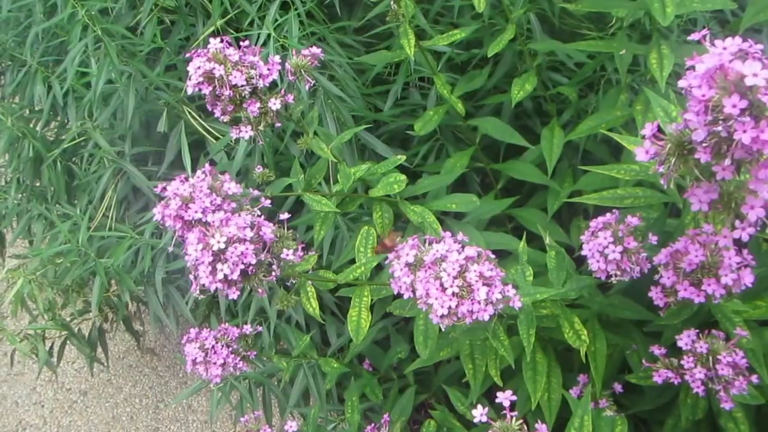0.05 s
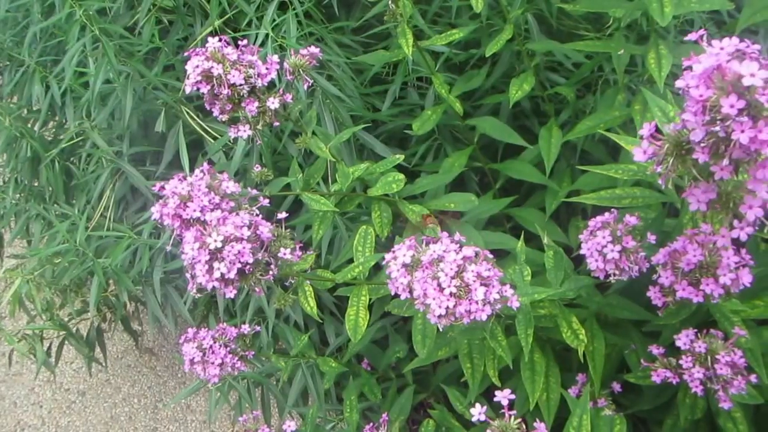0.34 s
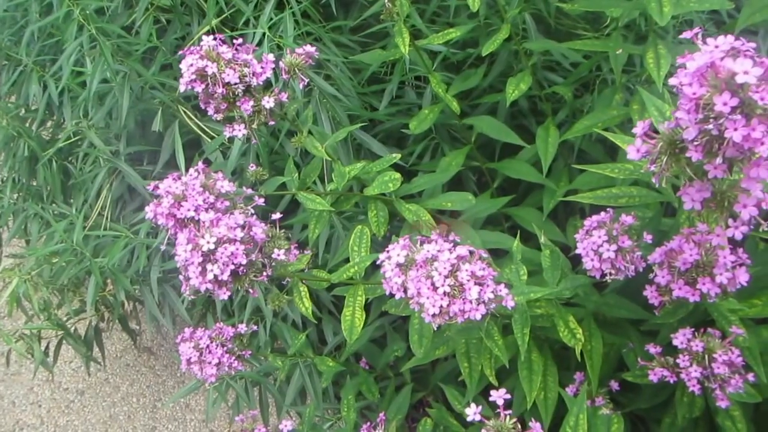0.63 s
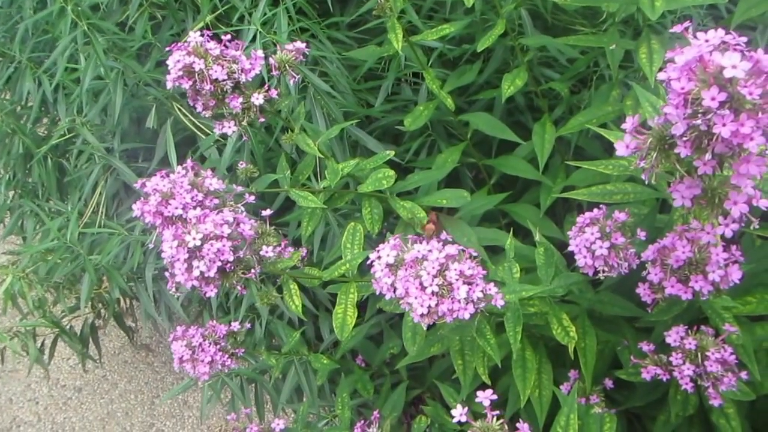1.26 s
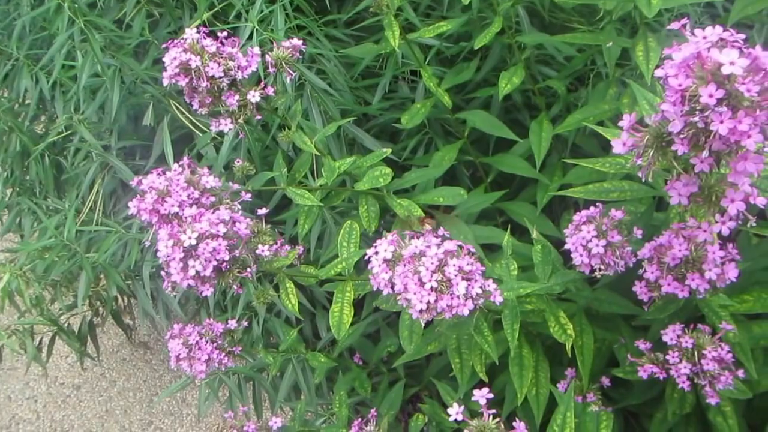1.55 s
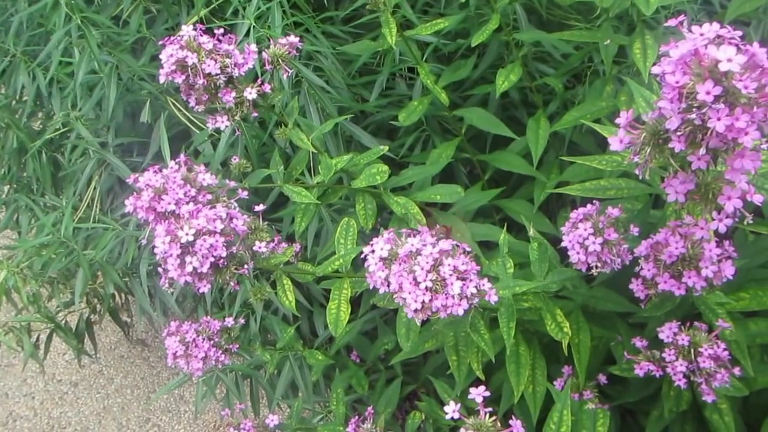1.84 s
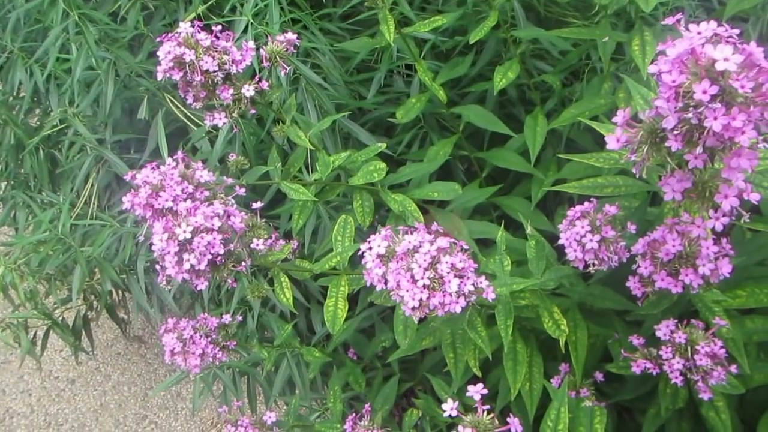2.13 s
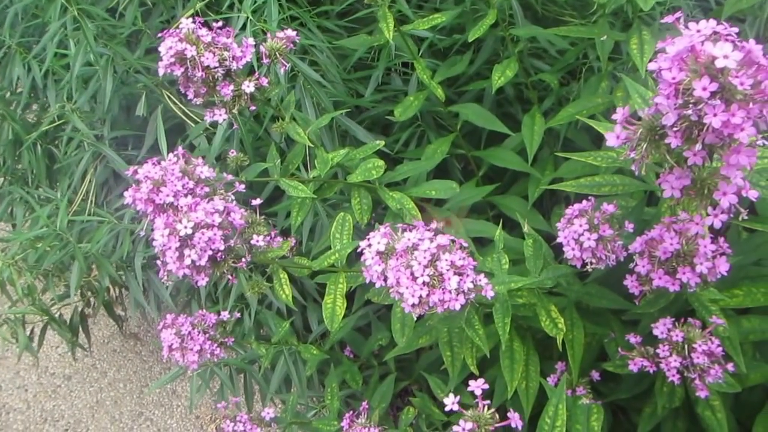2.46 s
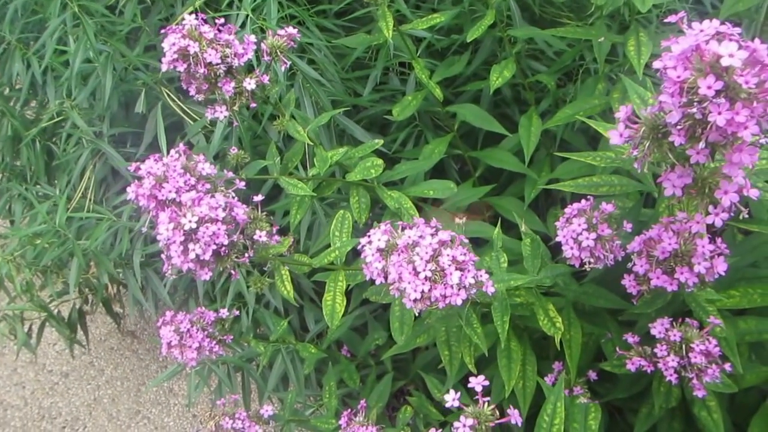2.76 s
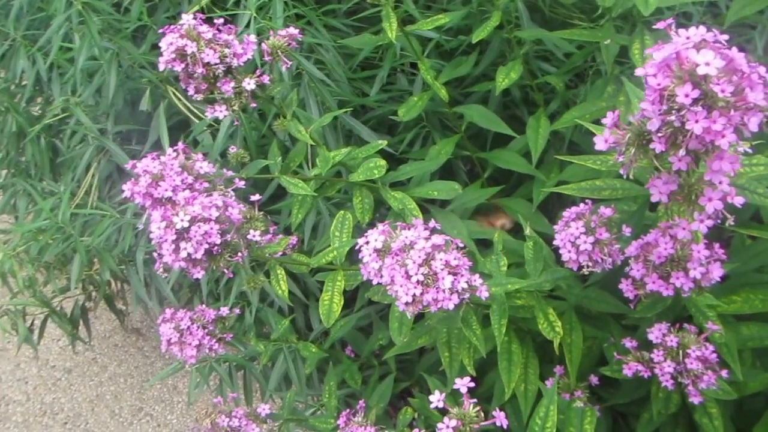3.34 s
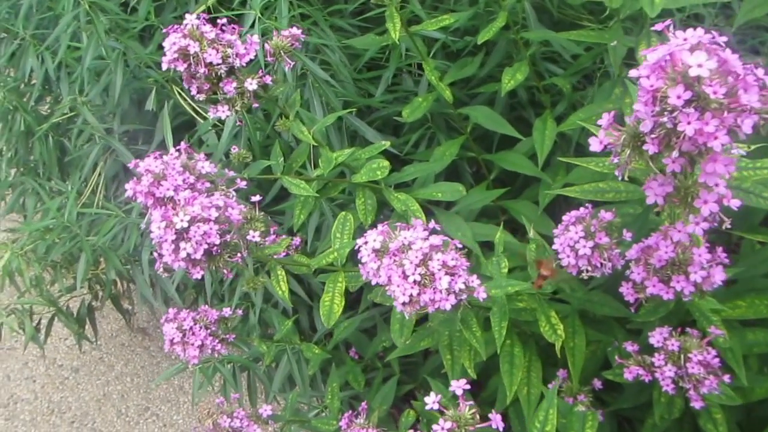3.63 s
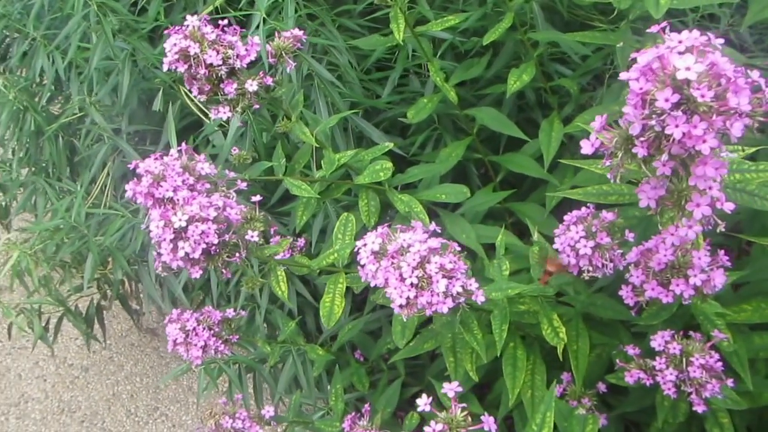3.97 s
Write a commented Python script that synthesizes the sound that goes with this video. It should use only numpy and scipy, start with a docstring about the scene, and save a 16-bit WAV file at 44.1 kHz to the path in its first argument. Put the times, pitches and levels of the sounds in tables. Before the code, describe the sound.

A chorus of crickets trilling outdoors, with far traffic and a droning engine behind.

```python
"""A summer flower bed. From the start, traffic rumbles and an engine drones behind a far insect hiss,
while crickets trill all around, each wing stroke a short falling whistle, and a small katydid rattles
its wings high above them. A dull tap comes early, and leaves brush faintly just before the middle.
Near the end something clicks close by; the katydid stops a moment later and the crickets sing on."""
import sys
import numpy as np
from scipy import signal
from scipy.fft import rfft, irfft
from scipy.io import wavfile
from scipy.ndimage import uniform_filter1d

SR = 44100
rng = np.random.default_rng(int(sys.argv[2]) if len(sys.argv) > 2 else 0)


def to_wav(sig):
    """Store sig (one row per channel, or 1-D mono) as 16-bit WAV at the path in sys.argv[1].

    Samples outside -1..1 are clipped; the rate is SR.
    """
    pcm = np.clip(np.atleast_2d(sig), -1, 1) * 32767
    pcm = np.round(pcm).astype(np.int16)
    wavfile.write(sys.argv[1], SR, pcm.T)  # frames by channels


N = 176400


def undb(db):
    """Turn decibels into a gain."""
    return 10 ** (np.asarray(db) / 20)


def level(x, db):
    """Set a sound's average (rms) level."""
    return x * undb(db) / np.sqrt(np.mean(x ** 2) + 1e-20)


def gain_curve(t, points):
    """A gain that follows (seconds, dB) points."""
    return undb(np.interp(t, *np.array(points, float).T))


def wander(rate):
    """A smooth random wobble of size near 1, changing about rate times a second."""
    hold = max(int(SR / rate), 1)
    steps = np.repeat(rng.standard_normal(N // hold + 2), hold)
    return 1.3 * uniform_filter1d(uniform_filter1d(steps, hold), hold)[:N]


def colour(x, points):
    """Filter by an outline of (Hz, dB) points, falling 80 dB an octave beyond its ends."""
    hz, db = np.array(points, float).T
    octave = np.log2(np.maximum(np.fft.rfftfreq(N, 1 / SR), 1))
    knots = np.log2(hz)
    outside = np.abs(octave - np.clip(octave, knots[0], knots[-1]))
    return irfft(rfft(x) * undb(np.interp(octave, knots, db) - 80 * outside), N)


def noise(points, db):
    """Noise shaped by an outline and set to a level."""
    return level(colour(rng.standard_normal(N), points), db)


def tone(hz):
    """A pure tone that follows a moving pitch."""
    return np.sin(2 * np.pi * (np.cumsum(hz) / SR + rng.random()))


def foliage(x, echo_db, decay_s=.023):
    """Leaves and ground scatter a sound into a short, dense echo."""
    t = np.arange(SR // 4) / SR
    tail = rng.standard_normal(len(t)) * np.exp(-t / decay_s)
    tail /= np.sqrt(np.sum(tail ** 2))
    return x + undb(echo_db) * signal.fftconvolve(x, tail)[:N]


# The road's rumble and the tyres' hiss. Each row: frequency in Hz, relative strength in dB.
RUMBLE_COLOUR = [(12, -21), (20, -9), (48, -0.5), (65, 0), (81, -3), (112, -1.5), (140, -8.5), (226, -12),
                 (258, -18), (594, -18.5), (700, -23.5), (910, -47), (1540, -120)]
TYRE_COLOUR = [(600, -10), (780, -15.5), (880, 2.5), (1050, 0), (1300, 1.5), (1600, 0.5), (2000, -7.5),
               (2500, -12.5), (3100, -18.5), (5000, -20), (9000, -24), (12000, -27), (16000, -22)]
# How the low hum swells. Each row: time in seconds, gain in dB.
HUM_SWELL = [(0, -5), (.3, 5.5), (.55, -6), (.9, 6), (1.3, -10), (1.7, -0.5), (2.5, 1.5), (3.1, -2.5),
             (3.6, 2.5), (4, 5)]

def traffic(t):
    """A far road rumbles and tyres hiss over a low, swelling hum."""
    rumble = noise(RUMBLE_COLOUR, db=-36) * undb(.4 * wander(2.42))
    tyres = noise(TYRE_COLOUR, db=-51.5) * undb(.9 * wander(2.7))
    hum = tone(hz=60.1 + 1.14 * wander(13)) * undb(2.5 * wander(10))
    return rumble + tyres + level(hum, db=-40.5) * gain_curve(t, HUM_SWELL)


# The engine's tones. Each row: multiple of its turning rate, level in dB.
ENGINE_TONES = [(4.55, -46), (5, -44.5), (6, -51.5), (7, -50.5), (8, -55), (12, -59), (13, -63),
                (14, -61.5), (15, -62)]
# Its one booming tone. Each row: time in seconds, level in dB.
BOOM_LEVEL = [(0, -56), (.45, -54), (.75, -43), (1.0, -50), (1.35, -45.5), (1.7, -55), (3.0, -57),
              (3.7, -52), (4, -55)]

def engine(t):
    """An engine drones in wavering tones at multiples of its turning rate."""
    turn_hz = 22.55 * (1 + .00392 * wander(4))
    drone = sum(level(tone(k * turn_hz) * undb(3 * wander(9)), db) for k, db in ENGINE_TONES)
    boom = level(tone(10 * turn_hz), db=0) * gain_curve(t, BOOM_LEVEL)
    return drone + boom


# Faint machine tones. Each row: pitch in Hz, level in dB.
WHINES = [(866, -74), (1012, -66), (1608, -68.5)]

def machine_whine():
    """Machines whine, wobbling a little in pitch and loudness."""
    return sum(level(tone(hz + 4 * wander(30)) * undb(2.6 * wander(12)), db) for hz, db in WHINES)


# The far insects' hiss. Each row: frequency in Hz, relative strength in dB.
INSECT_COLOUR = [(3400, -11.5), (4000, -6.5), (4500, 2), (5100, -0.5), (5700, -3.5), (6500, -4)]

def far_insects():
    """Distant insects blur into a flickering hiss."""
    return noise(INSECT_COLOUR, db=-62.5) * undb(.8 * wander(18))


# The sound of brushing leaves. Each row: frequency in Hz, relative strength in dB.
RUSTLE_COLOUR = [(2300, -6), (3700, 0), (4600, -2), (7000, -12)]

def rustle(t, peak_s=1.795, width_s=.03):
    """Leaves brush together for a moment."""
    return noise(RUSTLE_COLOUR, db=-65) * np.exp(-((t - peak_s) / width_s) ** 2)


# The tap's dull sound. Each row: frequency in Hz, relative strength in dB.
TAP_COLOUR = [(600, -7), (1100, 0), (1550, -5), (2200, -28), (10000, -38)]

def tap(t, start_s=.7402, decay_s=.002):
    """A faint, dull tap: a burst of noise that dies at once."""
    return noise(TAP_COLOUR, db=-39) * (t >= start_s) * np.exp(-np.abs(t - start_s) / decay_s)


# The click and its rebound. Each row: start in seconds, gain in dB.
CLICK_HITS = [(3.3715, -21.5), (3.3756, -36)]
# The tones it rings with. Each row: pitch in Hz, gain in dB, seconds to fade by 60 dB.
CLICK_RING = [(1610, 1, .015), (1734, 0.5, 0.014), (1910, -2.5, 0.015), (2370, -26, 0.0093),
              (4350, -21, 0.0052), (4680, -12, 0.023), (5200, -17, .009)]
# Filters for the snap alone and for the whole click. Each row: frequency in Hz, gain in dB.
SNAP_COLOUR = [(1500, 6), (2200, -1), (3000, -16), (4200, -5), (5300, -1), (6200, -16), (10000, -28)]
CLICK_COLOUR = [(1350, -25), (1540, -1), (8000, -2)]

def click(t, attack_s=.00083, snap_decay_s=.0019):
    """Something small and hard hits and rebounds, each time with a dry snap and a brief ring."""
    out = np.zeros(N)
    for start_s, db in CLICK_HITS:
        age = np.maximum(t - start_s, 0)
        ring = sum(undb(ring_db - 60 * age / fade_s) * np.sin(2 * np.pi * hz * age)
                   for hz, ring_db, fade_s in CLICK_RING)
        snap = noise(SNAP_COLOUR, db=-7) * np.exp(-age / snap_decay_s)
        out += undb(db) * (ring + snap) * (1 - np.exp(-age / attack_s))
    return colour(out, CLICK_COLOUR)


# The parts of one wing cycle. Each row: start, peak and end as shares of the cycle,
# level in dB before the echo and swell, outline of (Hz, dB) points.
WING_PARTS = [ (.03, .1, .24, -73, [(8300, -25), (9350, 0), (9950, -7), (10600, -3), (12000, -14),
              (14000, -25)]), (.43, .47, .6, -71, [(3300, -25), (4100, -1), (5100, 0), (6200, -20)]),
              (.22, .76, .93, -66, [(9500, -22), (11200, -10), (11750, -2), (12000, -11), (12250, 0),
              (12500, -11), (12950, 2), (13300, -3), (14000, -6), (14550, 2), (14950, -3), (15300, 0),
              (15800, -1)])]

def katydid(t, cycles_per_s=27.04, teeth_per_s=14000, stop_s=3.47, rise_db_per_s=.5):
    """Tiny wing teeth strike: each cycle is a short opening scrape, a tick and a long closing rasp."""
    cycle = (cycles_per_s * t + .33) % 1
    rattle = np.zeros(N)
    for start, peak, end, db, outline in WING_PARTS:
        strikes = rng.random(N) < teeth_per_s / SR
        strength = 1 + .56 * rng.standard_normal(N)
        force = np.sqrt(np.interp(cycle, [start, peak, end], [0, 1, 0]))
        rattle += level(colour(strikes * strength * force, outline), db)
    singing = np.clip((stop_s - t) / .008, 0, 1)
    swell = undb(rise_db_per_s * (t - t.mean()) + .62 * wander(25.2))
    return foliage(rattle * singing, echo_db=-5) * swell


def cricket(strokes_per_s, hz, fall_hz, db, sounding_share=.62):
    """The wing's scraper slows along a row of teeth, so each stroke swells and falls in pitch."""
    cycle = np.cumsum(strokes_per_s * (1 + .012 * wander(30))) / SR + rng.random()
    # Every stroke gets its own loudness and tuning.
    size, tuning = rng.standard_normal((1024, 2))[cycle.astype(int) % 1024].T
    along = np.minimum(cycle % 1 / sounding_share, 1)  # 0 to 1 through a stroke
    tooth_roughness_hz = 129 * wander(1500)
    pitch = hz * (1 + .007 * tuning) - fall_hz * (along - .5) + tooth_roughness_hz
    swell = np.sqrt(np.abs(np.sin(np.pi * along))) * undb(-.5 * size)
    return level(foliage(swell * tone(pitch), echo_db=-11), db)


# The far crickets' blur. Each row: frequency in Hz, relative strength in dB.
CHORUS_COLOUR = [(6200, -23), (6500, -13), (6900, -12), (7370, 10.5), (7780, 4), (8200, -2.5), (8800, -16)]
# The near crickets. Each row: strokes a second, mid-stroke pitch in Hz, fall per stroke in Hz,
# level in dB halfway through the scene.
NEAR_CRICKETS = [(45.44, 7256, 1150, -52), (62.8, 7480, 400, -57), (79.1, 7620, 640, -58),
                 (54.6, 7450, 380, -57.5), (88.1, 7700, 700, -60.5)]

def crickets(t, rise_db_per_s=.24):
    """One steady whistler, the near singers and a far chorus all slowly grow louder."""
    whistle = tone(hz=7103 + 18 * wander(90)) * undb(1.5 * wander(60))
    near = sum(cricket(*row) for row in NEAR_CRICKETS)
    chorus = noise(CHORUS_COLOUR, db=-52)
    return (level(whistle, db=-58) + near + chorus) * undb(rise_db_per_s * (t - t.mean()))


def scene():
    """Insects in front, traffic behind and three brief sounds, in one channel."""
    t = np.arange(N) / SR
    insects = far_insects() + crickets(t) + katydid(t)
    background = traffic(t) + engine(t) + machine_whine()
    return (insects + background + click(t) + tap(t) + rustle(t))[None]


def record(dry):
    """Fade the sound in quickly and cut its highest treble."""
    fade_s, top_hz = .004, 15680
    fade_in = np.minimum(np.arange(N) / SR / fade_s, 1)
    treble_cut = signal.ellip(12, .1, 80, top_hz, fs=SR, output="sos")
    return signal.sosfilt(treble_cut, dry * fade_in)


dry = scene()
out = record(dry)
to_wav(out)
```